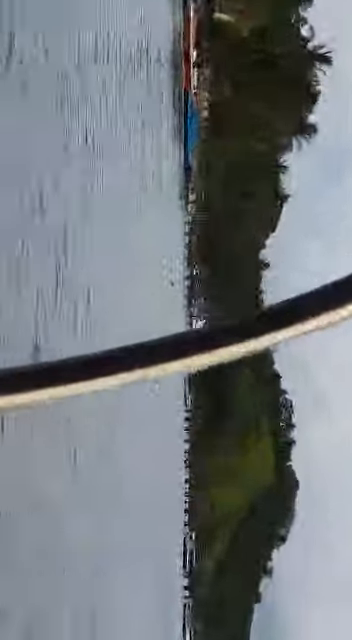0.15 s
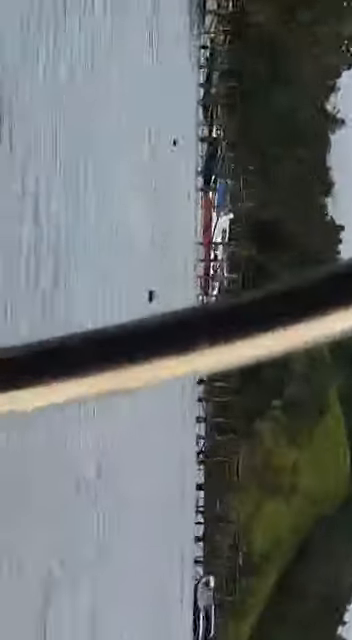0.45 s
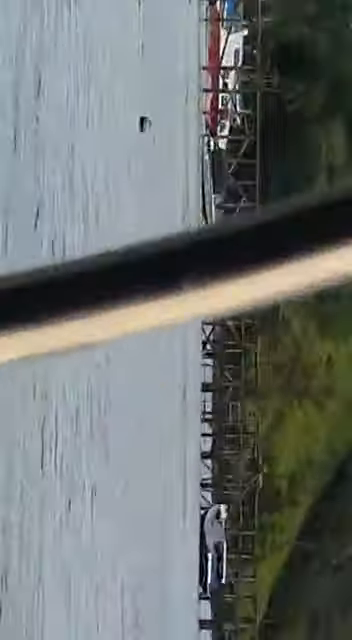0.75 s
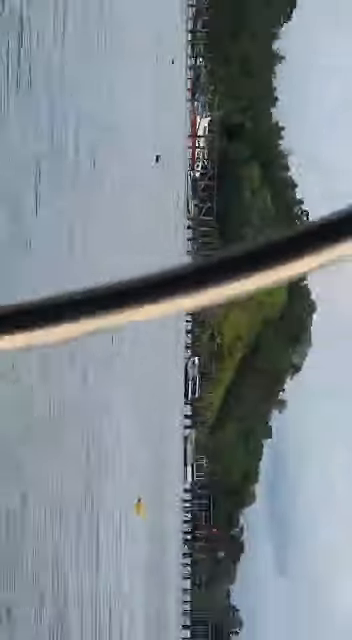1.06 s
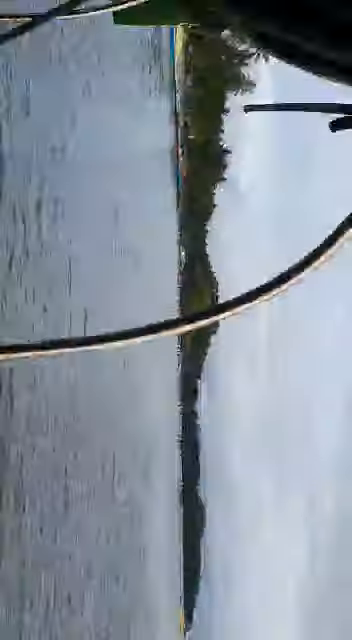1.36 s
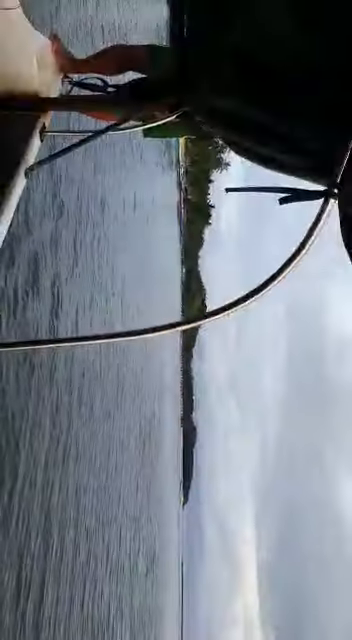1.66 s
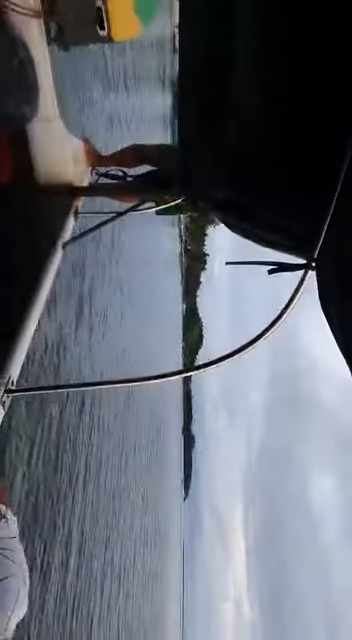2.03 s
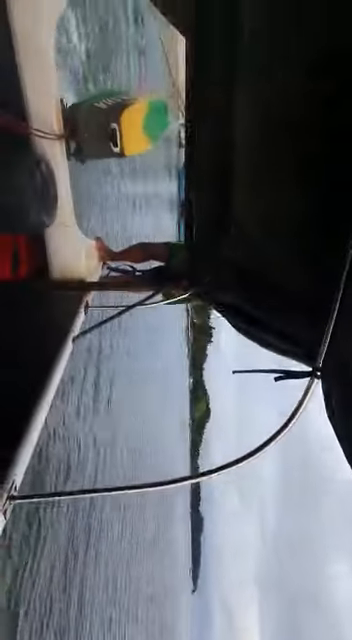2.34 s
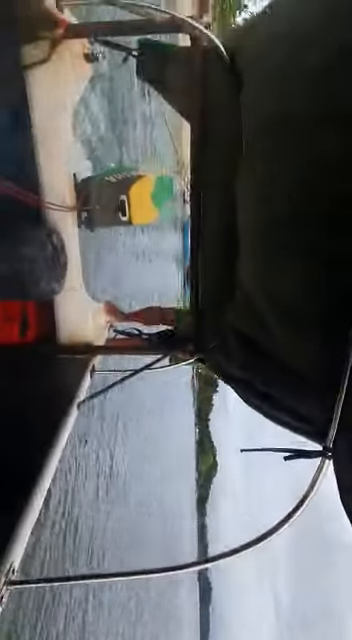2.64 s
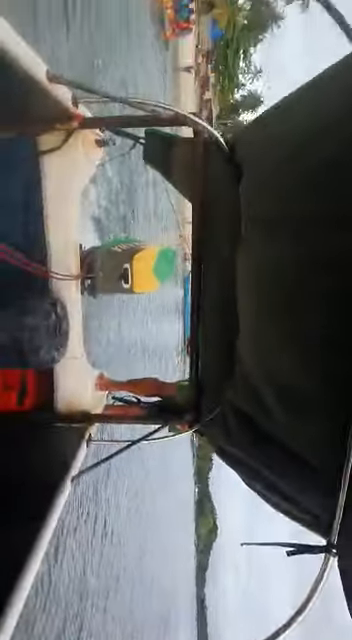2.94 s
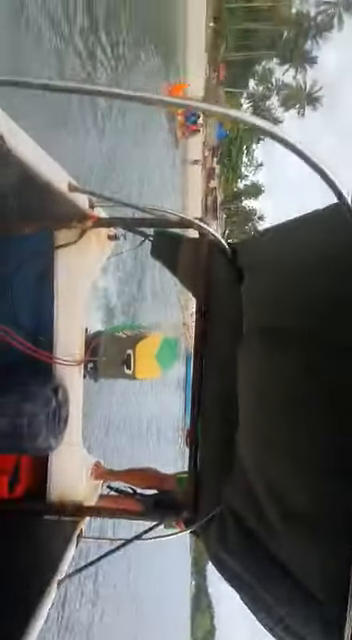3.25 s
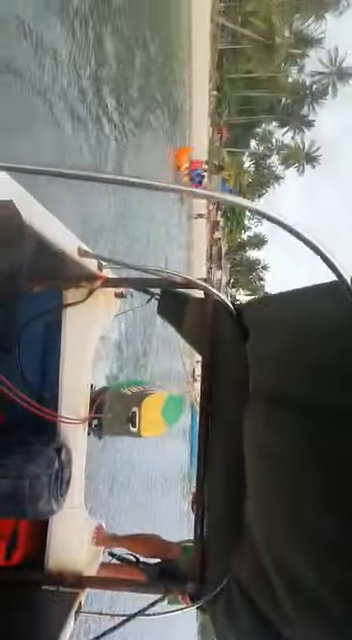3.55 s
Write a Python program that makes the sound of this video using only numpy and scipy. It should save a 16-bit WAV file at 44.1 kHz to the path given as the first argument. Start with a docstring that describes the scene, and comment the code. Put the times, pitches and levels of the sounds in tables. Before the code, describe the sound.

A small outboard motor idles throughout, heard from inside an open boat as a low, uneven throb with irregular raspy sputters and a light metallic clatter. The hull gives soft booms near the start and around 1.6 and 3 seconds. Calm water washes quietly underneath. From about 2.5 seconds the churning wake comes forward a little and the motor moves from slightly left toward the middle.

```python
"""A low, uneven throb and the wash of calm water: a small two-stroke outboard idles behind an open boat. Every
turn of the crank is an impulse that excites the hull's modes. Every turn also rings the motor's casing and
releases an exhaust pulse that barks, rasps and spits, the full firings far more strongly than the weak turns;
now and then the hull booms. The listener slowly turns to face the stern, so the delay between the ears shifts
and the wake comes forward."""
import sys
import numpy as np
from scipy import signal
from scipy.fft import rfft, irfft, next_fast_len
from scipy.io import wavfile
from scipy.ndimage import uniform_filter1d, map_coordinates

SR = 44100
rng = np.random.default_rng(int(sys.argv[2]) if len(sys.argv) > 2 else 0)


def dump(signal):
    """Clip the signal to [-1, 1] and save it as 16-bit WAV at the path in sys.argv[1]."""
    limited = np.clip(np.atleast_2d(signal).T, -1, 1)
    pcm = np.round(limited * 32767).astype(np.int16)
    wavfile.write(sys.argv[1], SR, pcm)


N = 162729
CRANK_HZ = 33.14
BOAT_PAN_DB = 4.5   # left minus right


def from_db(db):
    """Amplitude ratio: tenfold for every 20 dB."""
    return 10 ** (np.asarray(db) / 20)


def rms_one(x):
    """Normalisation to unit mean power."""
    return x / np.sqrt(np.mean(x ** 2) + 1e-20)


def pan(db):
    """Interaural level difference at constant total power."""
    return rms_one(from_db(np.array([[.5], [-.5]]) * db))


def drift(corner_hz):
    """Random fluctuation: low-passed Gaussian noise of unit rms."""
    pole = np.exp(-40 * np.pi * corner_hz / SR)   # at a twentieth of the sample rate
    slow = signal.lfilter([1], [1, -2 * pole, pole ** 2], rng.standard_normal(N // 20 + 4002))[4000:]
    return np.interp(np.arange(N) / 20, np.arange(len(slow)), rms_one(slow))


def at_hz(points, hz):
    """Interpolation of each column on a logarithmic frequency axis."""
    f, *columns = np.transpose(points)
    return [np.interp(np.log(hz + 1), np.log(f), column) for column in columns]


def noise(spectrum):
    """Coloured noise of unit rms whose interaural coherence falls with frequency."""
    # sound field at the ears: f/Hz, coherence, left minus right level/dB
    field = [(513, 0.95, 3.5), (1190, 0.37, 2), (2180, 0.085, 4), (9200, 0.028, 5.5)]
    hz = np.fft.rfftfreq(next_fast_len(N) * 2, 1 / SR)
    db, = at_hz(spectrum, hz)
    coherence, pan_db = at_hz(field, hz)
    skirts = np.minimum(hz / spectrum[0][0], 1) ** 2 * np.minimum(spectrum[-1][0] / (hz + 1), 1) ** 2
    mid, side = rfft(rng.standard_normal((2, 2 * len(hz) - 2)))
    sign = np.array([[1], [-1]])
    ears = np.sqrt(1 + coherence) * mid + np.sqrt(1 - coherence) * side * sign
    return rms_one(irfft(ears * from_db(db + sign * pan_db / 2) * skirts)[:, :N])


def pulses(times, levels_db, rise_s, decay_s, lead_s=0):
    """Incoherent summation: pulses with Gaussian rise and exponential tail add in power."""
    power, reach = np.zeros(N), SR // 10
    for s, db in zip(times - lead_s, levels_db):
        at = np.arange(max(0, int(s * SR) - reach), min(N, int(s * SR) + reach))
        age = at / SR - s
        rise = .5 * (age / rise_s) ** 2
        fall = (np.hypot(age, rise_s) - rise_s) / decay_s
        power[at] += (from_db(db) * np.exp(-np.where(age < 0, rise, fall))) ** 2
    return np.sqrt(power)


def crank_turns():
    """A quasi-periodic pulse train: weak turns fill the gaps between full firings."""
    # full firings: t/s, then level/dB of ring, bark, rasp and spit
    firings = [(0.067, -35, -31.5, -36.5, -39.5), (0.166, -31, -30, -41, -42.5),
               (0.26, -32.5, -34, -48, -60), (0.325, -22.5, -27.5, -33, -39),
               (0.411, -28.5, -30.5, -40, -50), (0.57, -28, -36, -37.5, -41.5),
               (0.599, -58, -34, -41.5, -44.5), (0.747, -34, -29.5, -40.5, -44.5),
               (0.937, -29.5, -27, -45, -43.5), (1.027, -22.5, -37, -37.5, -42),
               (1.059, -36, -40, -36.5, -49.5), (1.108, -24, -32.5, -37.5, -41.0),
               (1.297, -33, -29, -41, -48), (1.325, -32.5, -29, -36, -38.5),
               (1.481, -27, -33.5, -37.5, -42), (1.571, -31.5, -32, -35, -39),
               (1.659, -33, -31, -36.5, -44), (1.834, -31, -28, -35, -41.5), (1.858, -29.5, -35, -38, -41),
               (2.067, -32, -26, -37.5, -51), (2.228, -36, -40, -40.5, -48), (2.254, -28, -43, -42, -54),
               (2.443, -30.5, -30, -39.5, -47), (2.47, -41, -28, -37, -46), (2.636, -33, -24.5, -42, -49),
               (2.732, -32.5, -27, -38, -45), (2.808, -30, -32, -39.5, -59),
               (2.989, -35.5, -34, -40.5, -45), (3.019, -31, -27.5, -36.5, -48), (3.34, -33, -48, -39, -48),
               (3.426, -26.5, -30.5, -36.5, -52), (3.578, -29, -32, -38, -45.5),
               (3.677, -31, -28, -45, -56)]
    weak_db, spread_db, jitter_s = np.array([-44.5, -36.5, -51, -61]), 2, .0015
    rows, last = [], -1 / CRANK_HZ
    for s, *levels in firings:
        steps = max(1, round((s - last) * CRANK_HZ))
        for weak_s in np.linspace(last, s, steps + 1)[1:-1]:
            late, strength, *own = rng.standard_normal(6)
            scatter_db = spread_db * (strength + np.array(own)) / np.sqrt(2)
            rows.append([weak_s + jitter_s * late, *(weak_db + scatter_db)])
        rows.append([s, *levels])
        last = s
    return np.array(rows)


def hull_thuds(times):
    """Impulse response: each turn strikes the hull's modes, which ring as damped oscillators."""
    # hull modes: f/Hz, relative level/dB
    modes = [(64, -7), (77, 1.5), (86, 2), (111, -2.5), (132, -0.5), (170, -5), (215, -11)]
    spread_db, scatter, cycles_to_fall_60_db = 9, 0.46, 16.4
    at = np.clip((times * SR).astype(int), 0, N - 1)
    force = from_db(spread_db * rng.random(len(at)))
    thuds = np.zeros(N)
    for k, (hz, db) in enumerate(modes):
        impulses = np.zeros(N)
        impulses[at] = force * (1 + scatter * rng.standard_normal(len(at)))
        r, w = from_db(-60 * hz / (cycles_to_fall_60_db * SR)), 2 * np.pi * hz / SR
        mode = signal.lfilter([0, np.sin(w)], [1, -2 * r * np.cos(w), r * r], impulses + 1e-18)
        thuds += (-1) ** k * from_db(db) * mode
    return rms_one(signal.sosfilt(signal.butter(2, [55, 260], "band", fs=SR, output="sos"), thuds))


def hull_throb(times):
    """Amplitude modulation: thuds and rumble, evened over each turn, swell with the exhaust's chugs."""
    # rumble spectrum: f/Hz, relative level/dB
    rumble = [(40, -13), (55, -7.5), (80, 2.5), (150, -12), (480, -38)]
    # heavy exhaust chugs, felt through the hull: t/s
    chugs = [.066, .086, .17, 0.404, .517, .584, .814, .853, 1.33, 1.489, 1.583, 1.63, 1.665, 1.71, 2.104,
             2.234, 2.481, 2.517, 2.738, 2.97, 3.028, 3.343, 3.582, 3.678]
    # brief sags of the throb: t/s
    lulls = [1.05, 2.86, 3.475]
    idle_db, chug_db, lull_db, lull_s = -22, -19, -5, 0.039
    body = pan(BOAT_PAN_DB) * from_db(2.5) * hull_thuds(times) + noise(rumble)
    turn = int(SR / CRANK_HZ)
    power = uniform_filter1d(uniform_filter1d(np.mean(body ** 2, axis=0), turn), turn // 2)
    sag = sum(np.exp(-((np.arange(N) / SR - s) / lull_s) ** 2) for s in lulls)
    idle = from_db(idle_db + 2.5 * drift(16.7) + lull_db * sag)
    chugging = pulses(np.array(chugs), np.full(len(chugs), chug_db), rise_s=0.014, decay_s=0.0083)
    return body / np.sqrt(power) * np.hypot(idle, chugging)


def hull_shake():
    """Forced vibration: the boat shakes at the crank's wandering rate."""
    swell = from_db(3 * drift(6.1))
    hz = CRANK_HZ + 1.05 * drift(1.93)
    return pan(BOAT_PAN_DB) * from_db(-26.5) * rms_one(swell * np.sin(2 * np.pi * np.cumsum(hz) / SR))


def side_wash(treble_db):
    """Broadband water noise along the sides; it dulls as the listener turns in under the canopy."""
    # wash spectrum: f/Hz, relative level/dB
    spectrum = [(250, -5), (768, -8), (900, -13.5), (1250, -7), (1600, -16.5), (3200, -17.5), (7300, -32),
                (9500, -31), (15500, -36.5)]
    wash = from_db(-38.5 + drift(8.7)) * noise(spectrum)
    low = signal.sosfiltfilt(signal.butter(2, 3500, fs=SR, output="sos"), wash)
    spatter = rms_one(from_db(2 * drift(140)))
    return low + (wash - low) * from_db(treble_db) * spatter


def wake(level_db):
    """Turbulence: the churning wake is mid-range noise of flickering level."""
    # wake spectrum: f/Hz, relative level/dB
    spectrum = [(600, -4.5), (800, 1), (1300, -12.5), (1950, -0.5), (3200, -15.5)]
    return from_db(level_db + 2 * drift(39)) * noise(spectrum)


def casing_clatter(times, rasp_db):
    """Random excitation: the casing's higher modes, stirred by the rasp, give narrow bands of noise."""
    # higher casing modes: f/Hz, relative level/dB
    modes = [(1563, -15.5), (1825, -12.5), (2320, -15), (2637, -17), (2850, -16), (3219, -16.5),
             (4013, -20)]
    width_hz, floor_db = 26, -45.5   # the ringing never quite stops
    clatter = np.zeros((2, N))
    for hz, db in modes:
        phase = 2 * np.pi * hz * np.arange(N) / SR
        for ear in clatter:
            ear += from_db(db) * (drift(width_hz) * np.cos(phase) + drift(width_hz) * np.sin(phase))
    return pan(BOAT_PAN_DB) * clatter * (rasp_envelope(times, rasp_db) + from_db(floor_db))


def rasp_envelope(times, rasp_db):
    """Common excitation: one envelope drives both the exhaust's rasp and the casing's clatter."""
    return pulses(times, rasp_db, rise_s=0.0052, decay_s=0.016, lead_s=0.0044)


def exhaust(times, bark_db, rasp_db, spit_db):
    """Pulsating flow: each turn releases a low bark, a rasp and a spit of hiss, all bursts of noise."""
    # spectra of the three bursts: f/Hz, relative level/dB
    bark_spectrum = [(200, 4), (310, -7), (530, 0.5), (655, -17.5), (760, 1), (870, -16), (1500, -19)]
    rasp_spectrum = [(900, -5.5), (1400, 1), (3200, -2), (4400, -3.5), (7500, -16.5)]
    spit_spectrum = [(4000, -35), (6000, 3), (7300, -9), (9000, 4.5), (15500, -4.5)]
    bark = noise(bark_spectrum) * pulses(times, bark_db, rise_s=0.0043, decay_s=0.015, lead_s=0.0078)
    rasp = noise(rasp_spectrum) * rasp_envelope(times, rasp_db)
    spit = noise(spit_spectrum) * pulses(times, spit_db, rise_s=0.0052, decay_s=0.008, lead_s=0.0015)
    spray_grain = rms_one(from_db(2 * drift(550)))
    return bark + spray_grain * (rasp + spit)


def casing_ring(times, ring_db):
    """Damped resonance: at each turn the casing rings briefly at one wavering pitch."""
    hz = 1196 + 12.26 * drift(47.6)
    tone = np.sqrt(2) * np.sin(2 * np.pi * np.cumsum(hz) / SR)
    roughness = 1 + 0.3 * drift(54)
    return pan(db=0.5) * tone * roughness * pulses(times, ring_db, rise_s=0.0066, decay_s=0.0088)


def hull_booms():
    """Low-frequency transients: the hull's heavier booms are quickly damped bursts of noise."""
    # booms: t/s, level/dB
    booms = [(0.143, -21), (0.576, -26.5), (1.582, -20), (3.011, -21.5)]
    # boom spectrum: f/Hz, relative level/dB
    spectrum = [(110, -3), (180, -3.5), (290, -18)]
    return noise(spectrum) * pulses(*np.transpose(booms), rise_s=0.017, decay_s=0.025)


def left_first(x, lead_ms):
    """Interaural time difference: a positive lead delays the right ear."""
    right = map_coordinates(x[1], [np.arange(N) - lead_ms * SR / 1000], order=3, mode="nearest")
    return np.array([x[0], right])


def scene():
    """Superposition of hull, water and motor at the ears of a turning listener."""
    # the listener's turn: t/s, motor's lead at the left ear/ms, wash treble gain/dB, wake level/dB
    turning = [(0, 0.27, 4.5, -49.5), (1.8, 0.24, 3, -54), (2.5, 0.12, -1, -47.5), (3.0, 0.041, 1, -41.5),
               (3.6, -0.32, -0.5, -44.5)]
    s, *columns = np.transpose(turning)
    lead_ms, treble_db, wake_db = [np.interp(np.arange(N) / SR, s, column) for column in columns]
    times, ring_db, bark_db, rasp_db, spit_db = crank_turns().T
    around = hull_throb(times) + hull_shake() + side_wash(treble_db) + wake(wake_db) + hull_booms()
    casing = casing_clatter(times, rasp_db) + casing_ring(times, ring_db)
    motor = casing + exhaust(times, bark_db, rasp_db, spit_db)
    # hull and water lie all around, so they shift less than the motor
    return left_first(around, .12 + 0.61 * lead_ms) + left_first(motor, lead_ms)


def record(dry):
    """Band limiting: an elliptic low-pass cuts steeply above 15.7 kHz."""
    return signal.sosfilt(signal.ellip(10, .2, 80, 15700, fs=SR, output="sos"), dry)


dry = scene()
out = record(dry)
dump(out)
```